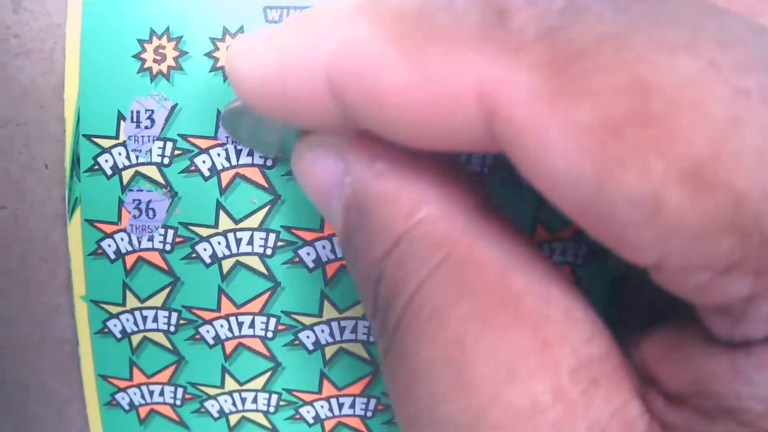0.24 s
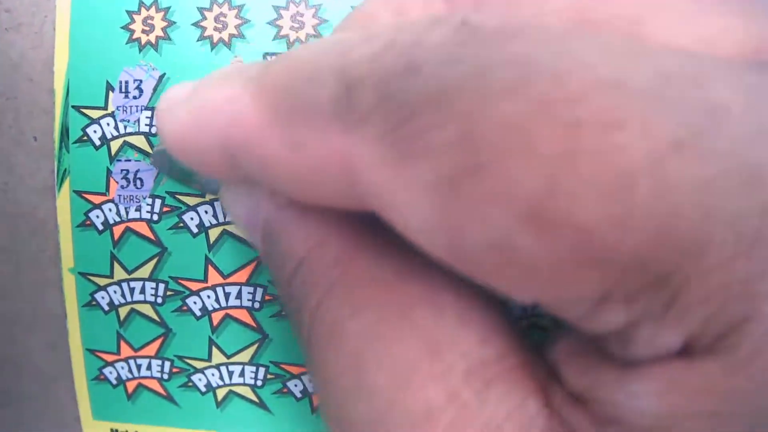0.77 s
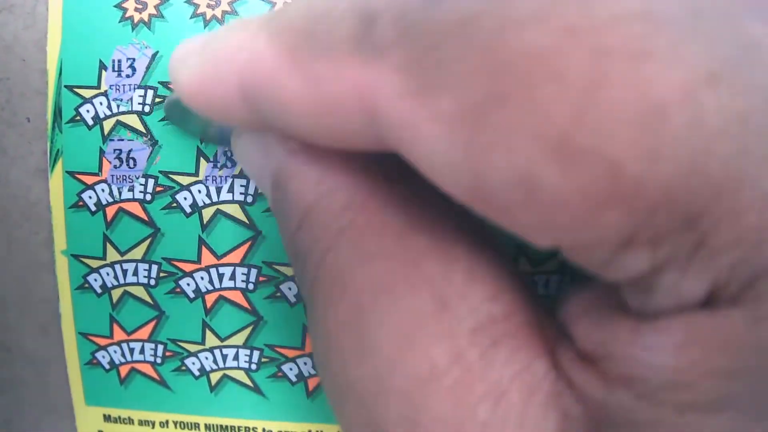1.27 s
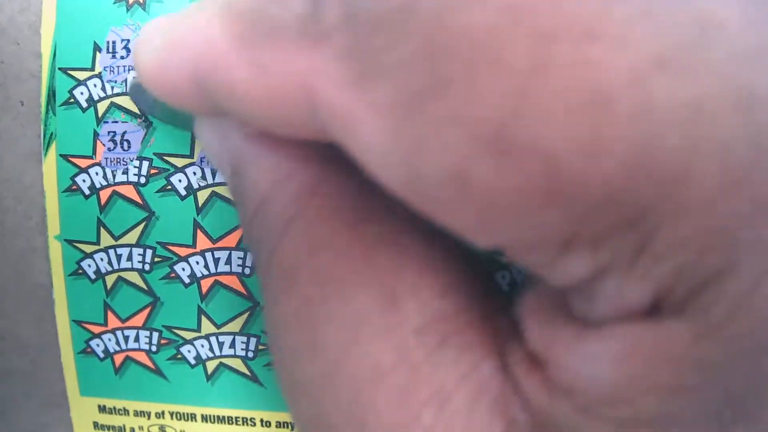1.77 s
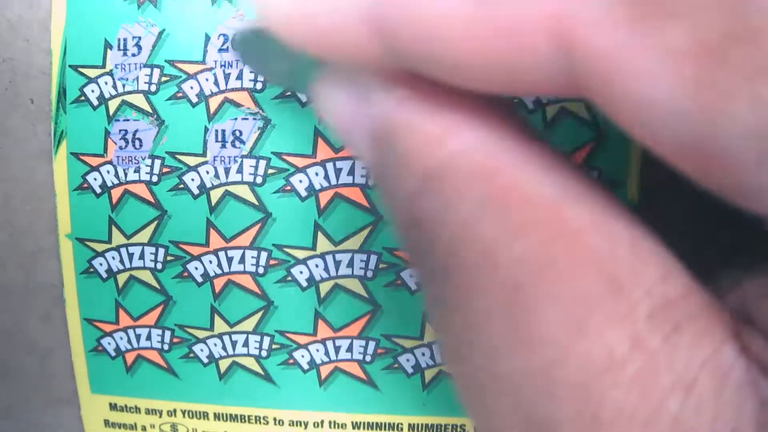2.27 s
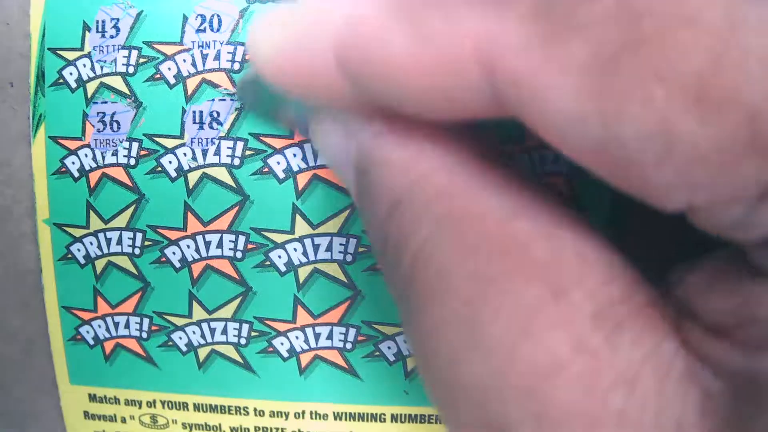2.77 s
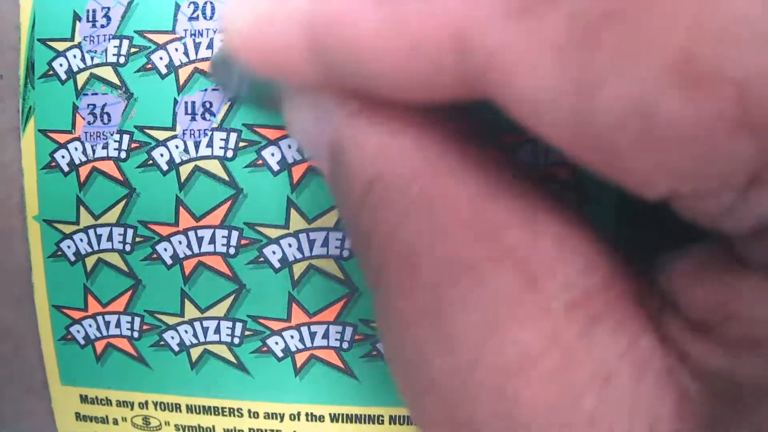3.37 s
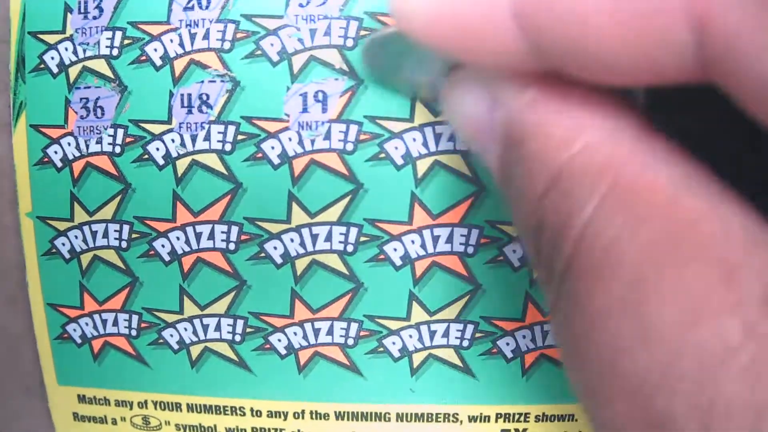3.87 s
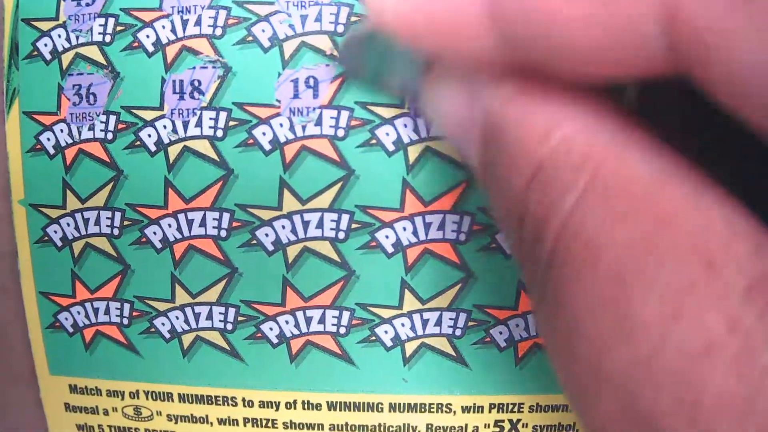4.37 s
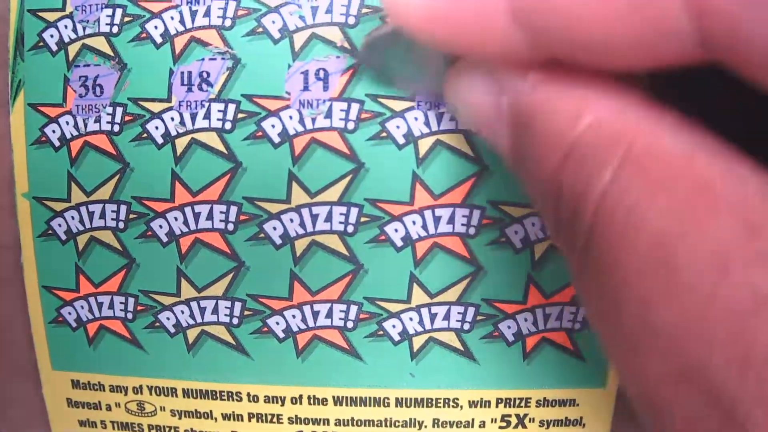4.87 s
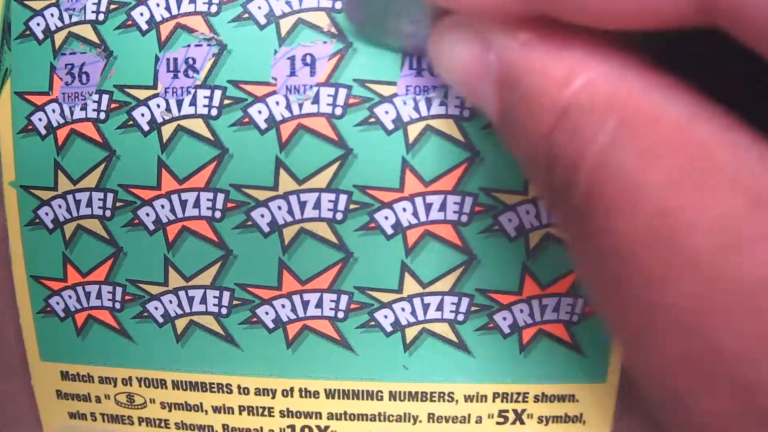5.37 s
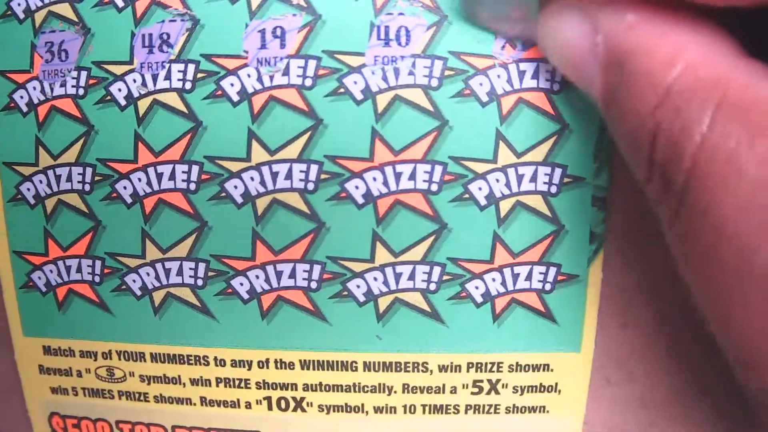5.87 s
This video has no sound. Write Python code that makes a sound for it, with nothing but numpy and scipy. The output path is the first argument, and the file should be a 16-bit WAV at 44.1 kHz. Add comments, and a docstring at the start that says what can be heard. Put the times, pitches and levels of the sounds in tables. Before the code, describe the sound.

Short raspy scratches of a metal edge on thin card, fine crumbling hiss, light knocks and soft hand rustles, close up in a humming room.

```python
"""A room hums and rumbles, and a hand brushes over paper; then a coin scrapes the coating off a paper ticket
on a table, in short bursts of back-and-forth strokes. Its edge sticks and slips, which rattles the card,
while the coating crumbles with a fine hiss; now and then the coin taps down. Skin sliding on paper is
filtered noise, and the hand bumps the table softly. A close stereo microphone adds its own hiss."""
import sys
import numpy as np
from scipy import signal
from scipy.fft import rfft, irfft
from scipy.io import wavfile

SR = 44100
rng = np.random.default_rng(int(sys.argv[2]) if len(sys.argv) > 2 else 0)


def pcm_store(signal):
    """Save signal as 16-bit PCM."""
    levels = np.round(np.clip(np.atleast_2d(signal), -1, 1) * 32767)
    wavfile.write(sys.argv[1], SR, levels.astype(np.int16).T)


N = 270597
T = np.arange(N) / SR  # time in seconds

# Broad tone of the card on the table. Each row: frequency in Hz, level in dB.
CARD = [(200, -24.5), (500, -10.5), (750, -20), (1000, -4.5), (1400, 0.5), (1650, -3.5), (2000, -7),
        (2200, -14.5), (2420, -27), (2580, -26), (3100, -28), (3450, -35.5), (3900, -53.5)]
# Polarity of the difference signal at the two microphone ports. Each row: one port's sign.
SIDES = np.array([[1], [-1]])


def undb(db):
    """Decibels to gain."""
    return 10 ** (np.asarray(db) / 20)


def unit(x):
    """Scale to rms 1."""
    return x / np.sqrt(np.mean(x ** 2))


def noise():
    """White noise of rms about 1."""
    return rng.standard_normal(N)


def walk(rate):
    """Random drift with spread 1, in straight lines between `rate` random values per second."""
    knots = rng.standard_normal(4096)
    # interpolation shrinks the spread; the last factor restores it
    return np.interp(T * rate, np.arange(len(knots)), knots) * np.sqrt(3 / 2)


def response(points, modes=(), tilt_db=0, size=4096):
    """Causal impulse response of unit energy: a broad spectrum, resonances and a tilt across the mid range."""
    hz = np.maximum(np.arange(size // 2 + 1) * SR / size, 1)
    at, db = np.transpose(points)
    broad_db = np.interp(np.log(hz), np.log(at), db)
    tilt = tilt_db / 2 * np.tanh(np.log2(hz / 1550) / 0.61)
    gain = undb(broad_db + tilt)
    gain = gain * (1 + sum(undb(d) / (1 + (2 * (hz - f) / w) ** 2) for f, w, d in modes))
    # roll off beyond both ends of the curve
    gain = gain * np.minimum(hz / at[0], 1) ** 2 * np.minimum(at[-1] / hz, 1) ** 4
    # folding the cepstrum gives minimum phase, so the energy comes early
    cepstrum = irfft(np.log(gain))
    cepstrum[1:size // 2] *= 2
    cepstrum[size // 2 + 1:] = 0
    h = irfft(np.exp(rfft(cepstrum)))
    return h / np.sqrt(np.sum(h ** 2))


def ring(x, h):
    """Pass a force or a sound through a response."""
    return signal.fftconvolve(x, h)[:N]


def grains(rate, spread_db):
    """Clicks at random times, `rate` per second on average and of uneven size, scaled to rms 1."""
    hits = rng.random(N) < rate / SR
    sizes = undb(spread_db * np.clip(noise(), -2, 2))
    return unit(hits * np.sign(noise()) * sizes)


def pressure(t, peak, rise, fall, sharpness=1.47):
    """One push: it bears down, peaks and lets up."""
    ramp = np.interp(t, [peak - rise, peak, peak + fall], [0, 1, 0])
    return np.sin(np.pi / 2 * ramp) ** sharpness


def stick_slip(slip_hz, uneven, spread_db, count=8000):
    """The edge catches and lets go at uneven intervals; a longer hold tends to a harder release."""
    chance = np.clip(rng.standard_normal((count, 2)), -2, 2)
    hold = np.exp(uneven * chance[:, 0])  # in median holds
    at = (np.cumsum(hold) * SR / slip_hz).astype(int)
    size = np.sqrt(hold) * undb(spread_db * chance[:, 1])
    return unit(np.bincount(at[at < N], size[at < N], N))


def scraping(crumbs):
    """Slips rattle the card and shed flakes of coating; returns the shared sound and the fine grit."""
    # The coin scrubs to and fro. Each row: hardest point in seconds, length in seconds, force in dB,
    # direction (1 push, -1 pull).
    strokes = [(.683, .045, -40, 1), (.762, 0.047, -29, -1), (0.898, 0.063, -34, 1),
               (0.973, 0.063, -34, -1), (1.118, 0.097, -40, 1), (1.177, 0.045, -32.5, -1),
               (1.206, 0.042, -31, -1), (1.354, 0.058, -42.5, 1), (1.443, 0.058, -37.5, -1),
               (1.56, 0.12, -47.5, 1), (1.797, 0.071, -39.5, 1), (2.494, 0.062, -33.5, 1),
               (2.564, 0.061, -25.5, -1), (2.706, 0.063, -34.5, 1), (2.781, 0.076, -28.5, -1),
               (2.928, 0.059, -38, 1), (2.979, 0.03, -29.5, -1), (3.138, 0.074, -38.5, 1),
               (3.21, 0.018, -33.5, -1), (3.356, 0.072, -33.5, 1), (3.467, 0.03, -42, -1),
               (3.868, 0.062, -34.5, 1), (3.938, 0.058, -28, -1), (4.089, 0.076, -36, 1),
               (4.157, .063, -28, -1), (4.326, 0.095, -40.5, 1), (4.412, 0.054, -33.5, -1),
               (4.54, 0.1, -40.5, 1), (4.621, 0.075, -33, -1), (4.748, 0.031, -39.5, 1),
               (4.937, 0.081, -34, 1), (4.997, 0.14, -49, -1), (5.149, 0.067, -38, 1),
               (5.228, .06, -45, -1), (5.731, 0.063, -31, 1), (5.813, 0.082, -31.5, -1),
               (5.967, 0.079, -32, 1), (6.042, 0.067, -32.5, -1)]
    # The coin works across the ticket, column by column. Each row: start in seconds,
    # main resonance in Hz, upper resonance in Hz before the push-pull shift, brightness in dB.
    columns = [(0, 1444, 1794, -0.5), (2.35, 1412, 1880, -0.5), (3.7, 1330, 1810, 3.5),
               (5.55, 1434, 1750, 0)]
    # How strongly the scraping hisses over time. Each row: time in seconds, level in dB.
    hiss_level = [(.68, -1.5), (.88, 2), (1.45, -0.5), (1.8, 4), (2.5, -1.5), (2.95, -1), (3.14, 3.5),
                  (3.87, -2.5), (4.6, -1), (4.93, 1), (5.15, -1), (6, -4.5)]
    rise_share = 0.45  # part of a stroke spent bearing down
    # a push shaves the coating, dull and hissy; a pull digs the rim in, brighter and higher
    push_hiss_db, pull_bright_db, pull_raise = 2.5, 8.5, 0.02
    # crumbling at the usual force, before the mix, and its dB per dB of force
    hiss_db, usual_force_db, hiss_growth = -56.5, -34.5, 0.88
    # strength of the two resonances; a pull rings the main one harder
    main_db, pull_ring_db, upper_db = 0, 2, -1.5

    slips = stick_slip(slip_hz=794.0, uneven=.55, spread_db=0.4)
    # thick and thin patches of coating, each crossed in a few milliseconds
    patches = undb(2.37 * np.clip(walk(300), -1.5, 1.5))
    friction = (slips + undb(-8.5) * noise()) * patches
    rasp, force, shed = np.zeros((3, N))
    for peak, length, force_db, way in strokes:
        column = sum(peak > row[0] for row in columns[1:])
        _, main_hz, upper_hz, bright_db = columns[column]
        level_db = np.interp(peak, *np.transpose(hiss_level))
        rise, fall = length * rise_share, length * (1 - rise_share)
        # leave room for the card to ring on
        span = slice(int((peak - rise) * SR), int((peak + fall) * SR) + 2048)
        press = pressure(T[span], peak, rise, fall)
        push = press * undb(force_db)
        # the card's resonances depend on where and how steeply the coin presses it
        modes = [(main_hz, 80, main_db - way * pull_ring_db),
                 (upper_hz * (1 - way * pull_raise), 90, upper_db)]
        card = response(CARD, modes, tilt_db=bright_db - way * pull_bright_db)
        rasp[span] += signal.fftconvolve(friction[span] * push, card)[:len(press)]
        force[span] += push
        crumble_db = hiss_db + hiss_growth * (force_db - usual_force_db)
        shed[span] += press * undb(crumble_db + way * push_hiss_db + level_db)
    # flakes break off just after each slip
    burst = np.sqrt(np.abs(ring(slips ** 2, np.exp(-T[:1024] / 0.0017))))
    grit = [unit(grains(7000, 6.4) * (unit(burst) + 0.32)) * shed for _ in range(2)]
    # the mix of coarse and fine flakes, split at 9 kHz, keeps changing
    flakes = ring(grit[0], crumbs)
    coarse = signal.sosfiltfilt(signal.butter(3, 9000, fs=SR, output="sos"), flakes)
    fine = flakes - coarse
    flakes = coarse * undb(2 * walk(60)) + fine * undb(2 * walk(60))
    return undb(0.22) * rasp + undb(1.5) * flakes, grit[1] + undb(-19.5) * friction * force


def tapping(card, crumbs):
    """Each touch knocks the card and the table and makes a brief tick of metal on paper."""
    # The coin touches down or catches. Each row: time in seconds, knock in dB,
    # thud of the table in dB, both before the mix.
    taps = [(1.411, -28, -60), (1.597, -30, -60), (1.859, -26.5, -60), (1.977, -29, -60),
            (2.4186, -16.5, -29), (2.559, -15, -50), (3.002, -21.5, -44), (3.211, -20.5, -38),
            (3.805, -22, -29), (4.411, -22, -50), (4.551, -21, -53), (4.61, -26, -52), (5.161, -25.5, -50),
            (5.6404, -30, -60), (5.654, -12.5, -20), (5.82, -13.5, -41), (6.028, -15, -55)]
    # Tone of the table under a tap. Each row: frequency in Hz, level in dB.
    table_tone = [(130, -17), (240, 17), (330, -10), (500, -4), (800, 11), (1100, 0.5), (1800, -2.5)]
    # tick under a full-scale knock, before the mix, and its dB per dB of knock
    tick_db, tick_growth = -36.5, 0.26

    knock, tick, thud = np.zeros((3, N))
    for s, knock_db, thud_db in taps:
        at = int(s * SR)
        knock[at] += undb(knock_db)
        tick[at] += undb(tick_db + tick_growth * knock_db)
        thud[at] += undb(thud_db)
    table = response(table_tone)
    # hard metal gives each knock a snap above the card's resonances
    metal = response([(2300, 13), (3000, 3), (4000, -9.0), (5500, 0), (7000, -20), (9000, -35),
                      (13500, -11), (15500, -19)])
    snap = undb(-25) * ring(knock, metal)
    body = undb(-2.5) * ring(knock, card / np.abs(card).max())
    body = body + undb(-2.5) * ring(thud, table / np.abs(table).max())
    crush = ring(tick, np.exp(-T[:1024] / 0.0029))
    return body + snap + undb(-8.0) * ring(crush * noise(), crumbs), undb(-2.0) * crush * noise()


def dragging():
    """The coin's rim rubs lightly over card that is already bare, in random grains."""
    # The coin stays down between strokes. One row: hardest point in seconds, rise in seconds,
    # fall in seconds, level in dB before the drift.
    drag = (4.5, 1.15, 0.56, -46.5)
    # Tone of the drag. Each row: frequency in Hz, level in dB.
    drag_tone = [(900, -10), (1280, 1), (1500, -10), (1780, 5), (2050, -7), (2350, -32), (2800, -26),
                 (3250, -16), (3700, -52)]
    peak, rise, fall, db = drag
    level = pressure(T, peak, rise, fall) * undb(db + 2.3 * walk(30))
    return ring(grains(2500, 5.3) * level, response(drag_tone))


def sliding(card, rise=0.17):
    """The hand shifts with a quick push and comes slowly to rest; skin hisses and rubs on the paper."""
    # Skin slides over the paper. Each row: start in seconds, length in seconds, hiss in dB, rub in dB.
    slides = [(0.178, 0.2, -59, -75), (0.478, 0.48, -62.5, -63), (2.199, 0.097, -54, -59),
              (3.495, 0.28, -58, -72), (3.723, 0.31, -55, -54), (4.177, 0.65, -60.5, -47.5),
              (5.399, 0.12, -52, -68)]
    # Tone of skin on paper. Each row: frequency in Hz, level in dB.
    skin = [(2500, 2.5), (4000, -25), (5200, -1), (6000, 3), (6900, 9.5), (8000, -7), (10000, -14),
            (12000, 1), (14200, 1), (15600, 9.5)]
    hiss, rub = np.zeros((2, N))
    for start, length, hiss_db, rub_db in slides:
        speed = np.interp((T - start) / length, [0, rise, 1], [0, 1, 0])
        hiss += speed * undb(hiss_db)
        rub += speed * undb(rub_db)
    shared = ring(hiss * noise(), response(skin)) + ring(rub * grains(2500, 2.3), card)
    return shared, hiss * noise()


def bumping():
    """Soft flesh on the table makes only low sound."""
    # The side of the hand bumps the table. Each row: peak in seconds, rise in seconds,
    # fall in seconds, level in dB.
    bumps = [(3.845, 0.091, 0.076, -38.5), (4.31, 0.028, 0.043, -57), (4.685, 0.037, 0.011, -42.5),
             (4.89, 0.03, 0.028, -48)]
    push = sum(pressure(T, s, rise, fall) * undb(db) for s, rise, fall, db in bumps)
    return ring(push * noise(), response([(110, -3), (165, 2.0), (280, -10), (450, -8)]))


def reflections(x, wet_db, t60, near_db, near_t60):
    """Scatter from the hand and table within milliseconds, then a faint room tail."""
    t = T[:SR // 2]
    out = x
    # both tails are driven by the direct sound alone
    for delay, db, decay in ((.004, near_db, near_t60), (.012, wet_db, t60)):
        tail = rng.standard_normal(len(t)) * (t > delay) * np.exp(-np.log(1000) * t / decay)
        out = out + undb(db) * ring(x, tail / np.sqrt(np.sum(tail ** 2)))
    return out


def background():
    """Room noise, rumble and a wavering hum reach both ports alike; part of the hiss differs between them."""
    # Tone of the steady room noise. Each row: frequency in Hz, level in dB.
    room_tone = [(85, -15), (115, 2), (180, 0), (245, -5), (290, -8.5), (570, -7.5), (720, -12.5),
                 (1100, -17), (1500, -10), (1800, -19), (1960, -19.5), (2150, -32.5), (2600, -31),
                 (3800, -53)]
    # Resonances in the room noise. Each row: frequency in Hz, width in Hz, dB over the broad response.
    room_modes = [(880, 14, -6), (1967, 58, 2.5)]
    # Deep rumble of the room. Each row: frequency in Hz, level in dB.
    rumble_tone = [(12, -9), (25, 0), (38, -14.5), (55, -21), (72, -15), (95, -20.5), (160, -52)]
    # Hum of an appliance. Each row: frequency in Hz, level in dB, both before their drift.
    hum_partials = [(111, -52.5), (222, -58), (250, -56), (392, -60), (591, -60)]
    # Microphone hiss shared by the ports. Each row: frequency in Hz, level in dB.
    hiss_tone = [(2600, -25), (4000, -7.5), (5300, 5.5), (5900, -2), (6230, 9.5), (6600, 0), (7100, 4.5),
                 (7800, -1.5), (12000, -2), (14000, 1), (15600, 1.5)]
    # Microphone hiss that differs between the ports. Each row: frequency in Hz, level in dB.
    hiss_apart = [(25, 26.5), (120, 9), (600, 3), (1400, -9), (1950, 4), (2200, -1), (3100, 2.5),
                  (3650, 11.5), (4500, -4), (7000, -4), (12000, -7.5), (15600, -5)]
    # A thin whistle in that hiss. Each row: frequency in Hz, width in Hz, dB over the broad response.
    whistle = [(12650, 130, 5)]

    swell = undb(.7 * walk(5))
    room = undb(-43.0) * swell * ring(noise(), response(room_tone, room_modes))
    rumble = undb(-45.5 + 1.0 * walk(4.0)) * ring(noise(), response(rumble_tone, size=16384))
    hum = np.zeros(N)
    for hz, db in hum_partials:
        phase = 2 * np.pi * np.cumsum(hz + 2.59 * walk(14)) / SR
        hum += undb(db + 2 * walk(6)) * np.sqrt(2) * np.sin(phase)
    hiss = undb(-67.0) * ring(noise(), response(hiss_tone))
    apart = undb(-58.5) * ring(noise(), response(hiss_apart, whistle))
    return room + rumble + hum + hiss + SIDES * apart


def scene():
    """Coin and hand on the card, close to the microphone; their fine grit and hiss spread between the ports."""
    # Resonances of the card under a tapping coin or a hand. Each row: frequency in Hz, width in Hz,
    # dB over the broad response.
    card_modes = [(1320, 100, -5.5), (1780, 87, -8)]
    # Tone of the crumbling coating. Each row: frequency in Hz, level in dB.
    crumb_tone = [(2500, 7), (3900, -28), (4600, -2), (5250, 6.5), (5900, -2.5), (7000, 3.5), (8000, -4.5),
                  (10000, -16.5), (11600, -6), (12500, -12), (13500, 4), (14600, -5), (15100, 6),
                  (15800, -4.5)]
    # Tone of what differs between the two ports. Each row: frequency in Hz, level in dB.
    apart_tone = [(1150, -22), (1850, 4), (2300, -4.5), (3200, -5), (3650, 7), (4400, -8), (5800, -9.5),
                  (7200, -7), (8500, -10), (9900, -11), (10800, -11), (13200, -21), (14800, -8),
                  (15600, -11)]
    # Resonances in that difference. Each row: frequency in Hz, width in Hz, dB over the broad response.
    apart_modes = [(4900, 300, -2), (6700, 300, -9), (7960, 250, -6), (12650, 280, 4)]

    card, crumbs = response(CARD, card_modes), response(crumb_tone)
    shared, grit = np.sum([scraping(crumbs), tapping(card, crumbs), sliding(card)], axis=0)
    shared = shared + dragging() + bumping()
    apart = undb(-1.0) * ring(grit, response(apart_tone, apart_modes))
    space = dict(wet_db=-16.5, t60=0.35, near_db=-12.5, near_t60=0.026)  # levels in dB, decays in seconds
    mid = reflections(shared, **space)
    side = reflections(apart, **space)
    return mid + SIDES * side + background()


def record(dry):
    """The recorder cuts the top: a steep elliptic low-pass at 15.9 kHz."""
    return signal.sosfilt(signal.ellip(10, .2, 70, 15900, fs=SR, output="sos"), dry)


dry = scene()
out = record(dry)
pcm_store(out)
```